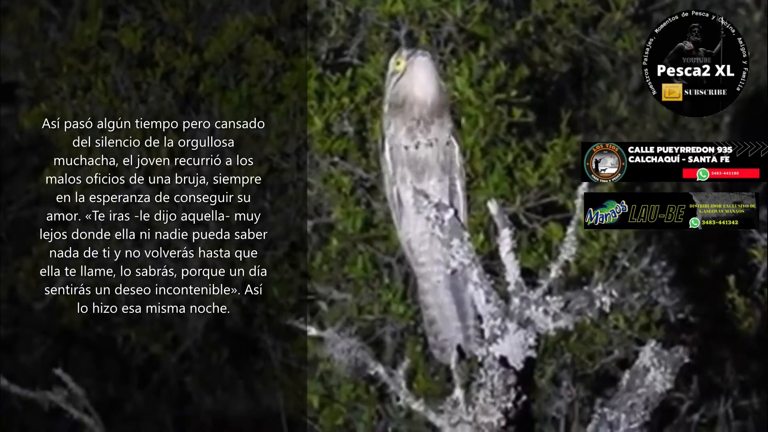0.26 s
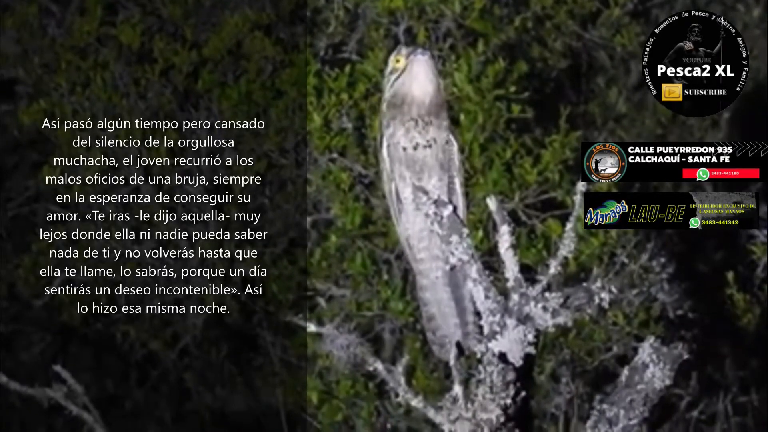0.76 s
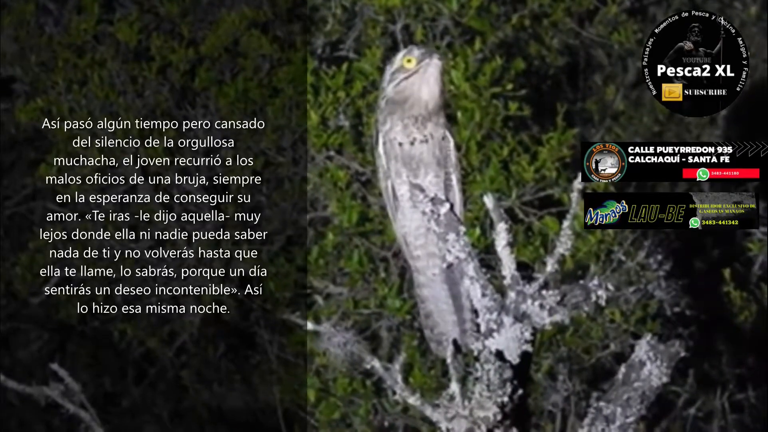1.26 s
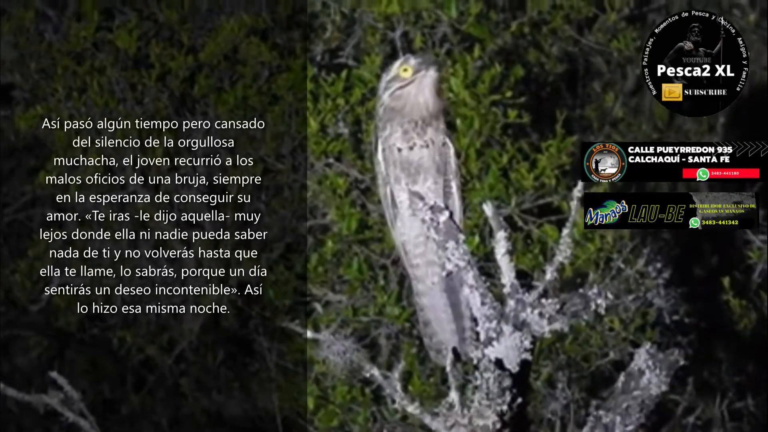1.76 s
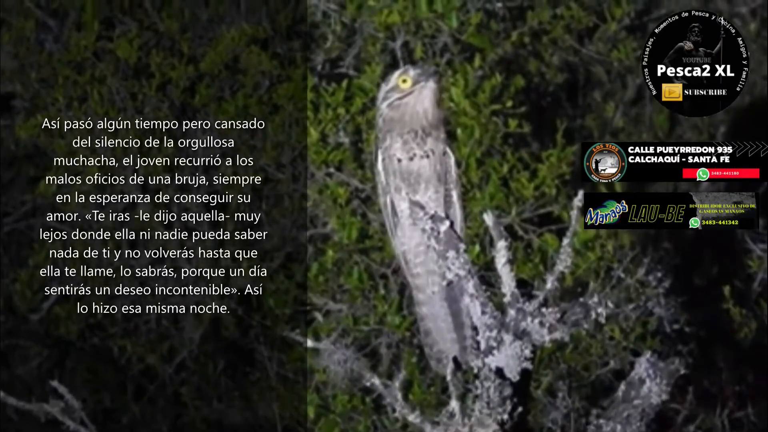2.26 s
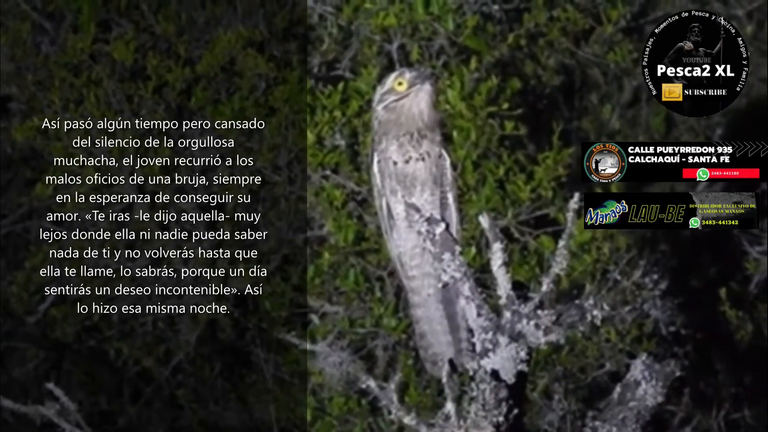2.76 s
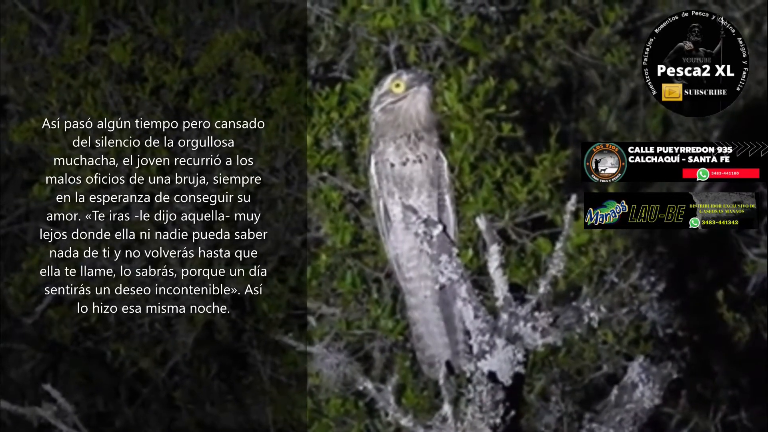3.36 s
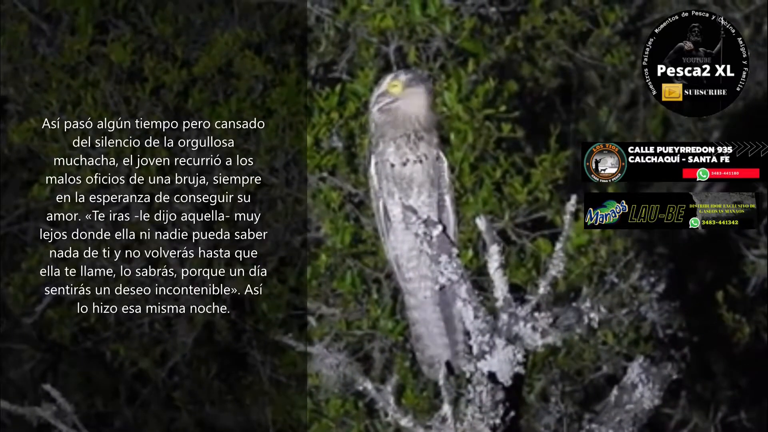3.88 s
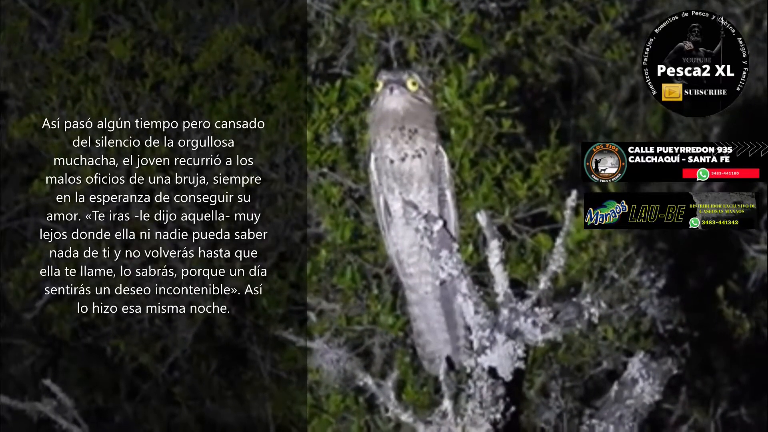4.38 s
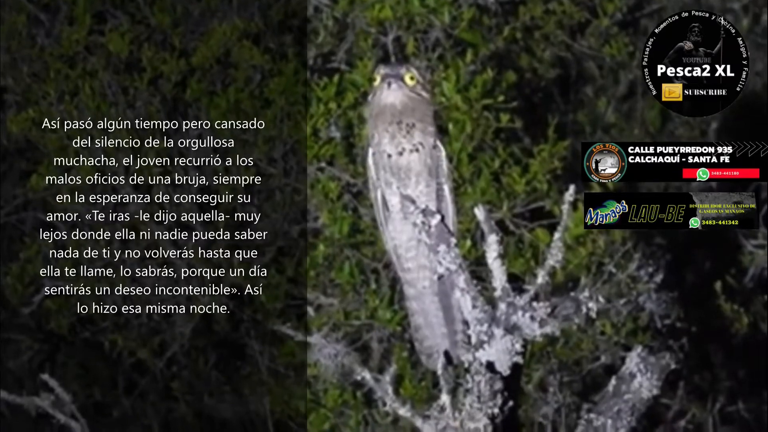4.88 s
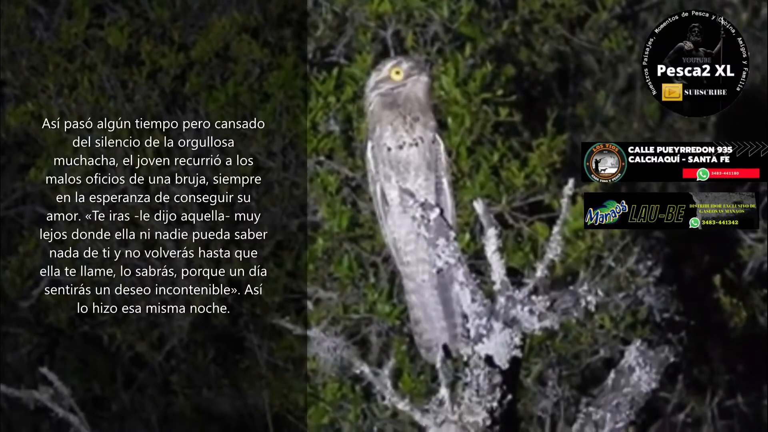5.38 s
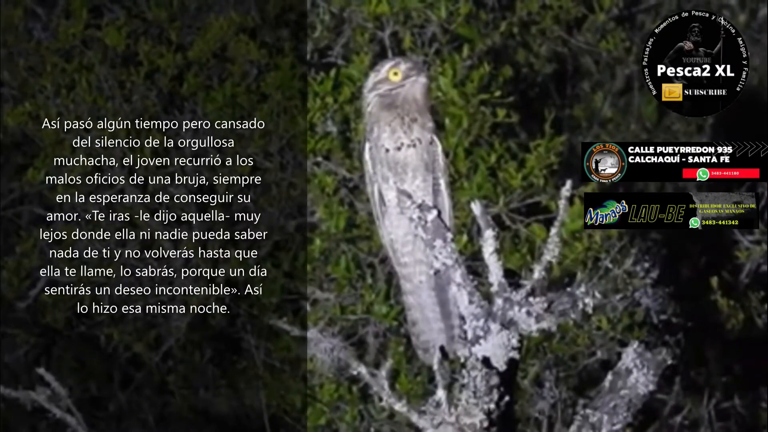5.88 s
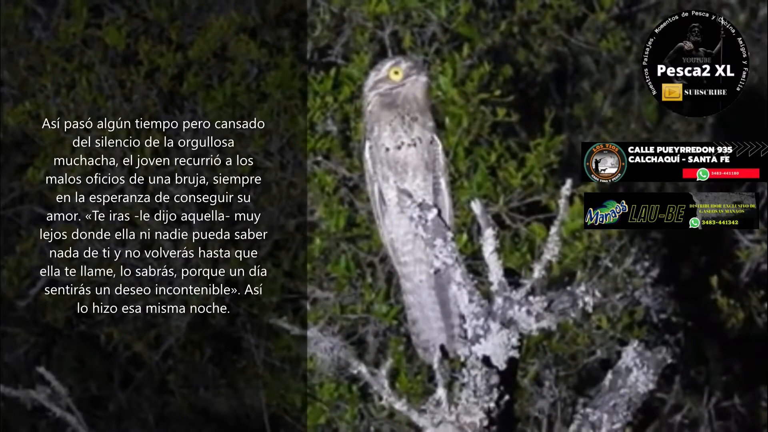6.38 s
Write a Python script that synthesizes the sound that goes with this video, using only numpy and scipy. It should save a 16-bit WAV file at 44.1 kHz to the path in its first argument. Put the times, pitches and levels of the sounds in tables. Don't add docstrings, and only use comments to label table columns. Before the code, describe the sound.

Outdoors at night, a bird on a branch gives a loud, pure whistle right at the start, then two much quieter, lower notes within the first second and a half. A nearby cricket chirps about six times a second throughout, over many far crickets and a bright insect hiss. Small twig ticks, one dull knock and very faint dove-like hoots follow. Stereo microphones, with light echo from trees.

```python
import sys
import numpy as np
from scipy import signal
from scipy.fft import rfft, irfft
from scipy.io import wavfile
from scipy.ndimage import uniform_filter1d

SR = 44100
rng = np.random.default_rng(int(sys.argv[2]) if len(sys.argv) > 2 else 0)


def store_pcm(level_fs):
    pcm = np.round(np.clip(level_fs, -1, 1) * 32767).astype(np.int16)
    wavfile.write(sys.argv[1], SR, np.atleast_2d(pcm).T)


def ratio(d):
    e = np.asarray(d, float) / 20
    return 10 ** e


N = 292383

# t/s, f/Hz, level/dB
WHISTLED_NOTES = [
    [(0, 884, -18.5), (.03, 883, -17.8), (.08, 902, -19.5), (.15, 915, -21), (.218, 919, -20)],
    [(.39, 736, -51), (.41, 746, -35.5), (.465, 746, -31), (.575, 764, -29), (.66, 756, -31.5),
     (.77, 732, -32), (.82, 764, -30.5)],
    [(1.036, 612, -49.5), (1.066, 629, -33.5), (1.14, 649, -32.5), (1.22, 645.4, -33), (1.39, 623, -37.5),
     (1.507, 596, -40.5)],
]
# t/s from its start, climb from the gulp/0-1, level/dB
SCOOP_UP = [(-.095, -.1, -78), (-.079, 0, -46), (-.06, .3, -67), (-.035, .72, -52.5), (-.015, .9, -58)]
# t/s from its end, share of its pitch/0-1, level/dB re its end
HOOK_DOWN = [(.006, .985, -3.5), (.013, .9, -16), (0.025, .76, -39)]
# f/Hz, level/dB per Hz
HISS_SPECTRUM = [(30, -44), (80, -42.5), (190, -27.5), (500, -34), (1050, -32.5), (1300, -34),
                 (1720, -30.5), (2640, -36.5), (4060, -32), (4800, -30), (5600, -16.5), (6850, -6),
                 (7700, -23.5), (8600, -40.5), (15500, -55.5)]
# f/Hz, width/Hz, level/dB over the hiss, throbs/per s
SINGERS_IN_HISS = [
    (4035, 330, 4, 3.5),
    (7485, 81, 7.5, 4.7),
    (670, 96, 4, 0.68),
    (1055, 58, 5.5, .9),
]
# t/s, length/s, level/dB added to the rumble
WIND_GUSTS = [
    (.7, 0.97, 11.5),
    (5.497, .6, -4),
    (6.2, 0.28, 2),
]
# t/s, length/s, f/Hz, width/Hz, level/dB over the hiss
UNDERGROWTH = [
    (3.53, 0.2, 720, 440, 4.5),
    (6.4, .05, 180, 55, 7),
    (4.85, 0.38, 600, 270, 3),
    (3.9, .03, 400, 60, 6),
]
# f/Hz, likeness/0-1
HISS_LIKENESS = [(60, 0.25), (180, 0.11), (500, .5), (1000, 0.72), (2500, 0.3), (5000, 0.59), (7000, 0.97),
                 (9500, 0.71), (14000, 0.54)]
# f/Hz, lead/rad
HISS_LEAD = [(0, 0), (1720, -0.11), (3790, -0.17), (4220, 1.46), (5250, 0.93), (6030, 2.5), (6370, 2),
             (6980, -0.23), (8440, 0.46)]
# chirps/per s, level/dB, pitch factor, lead at the left/samples
FAR_CRICKETS = [
    (5.5, -32, 1.01, 2.5),
    (5.9, -33, .98, 0.5),
    (6.2, -37, 1.03, 13.5),
    (5.2, -41.5, .95, 0),
    (5.7, -38, .9, 4),
    (6, -54, 1.0, -3),
]
# share of the stroke/0-1, f/Hz
STROKE_PITCH = [(0, 7027), (.35, 7010), (.62, 6774), (.85, 6265), (1, 5400)]
# t/s of first stroke, s from first to last stroke
NEAR_CHIRPS = [(0.0571, 0.0725), (0.2166, 0.0725), (0.3771, 0.0704), (0.5421, 0.073), (0.7181, 0.0725),
               (0.8866, 0.0714), (1.0536, 0.0719), (1.2282, 0.0584),
               (1.4796, 0.0709), (1.6686, 0.0576), (1.8504, 0.0593), (2.0402, 0.0584), (2.2016, 0.073),
             (2.3771, 0.073), (2.5516, 0.073), (2.7197, 0.0882), (2.8956, 0.0719), (3.0786, 0.0719),
             (3.2616, 0.0719), (3.4376, 0.0714), (3.6111, 0.073), (3.7944, 0.0567), (3.9481, 0.0704),
             (4.113, 0.0741), (4.2885, 0.087), (4.471, 0.087), (4.6541, 0.0709), (4.8141, 0.0709),
             (4.9721, 0.073), (5.1478, 0.0851), (5.3216, 0.0714), (5.4801, 0.073), (5.6561, 0.0863),
             (5.853, 0.0571), (6.0049, 0.0876), (6.1881, 0.0863), (6.3691, 0.0725), (6.5435, 0.0735)]
# t/s, level/dB at the peak
TWIG_TICKS = [
    (0.257, -32),
    (0.961, -49),
    (1.1045, -39.5),
    (2.738, -44.5),
    (4.015, -40),
    (5.549, -42),
    (5.7, -55),
    (5.9077, -40.5),
    (6.0912, -56.5),
]
# t/s, level/dB at the peak, f/Hz
DULL_KNOCK = (4.5875, -32.5, 690)
# t/s, held/s, f/Hz, level/dB, roughness/0-1
FAR_HOOTS = [
    (1.5, 0.057, 346.6, -57.5, 1.06),
    (1.795, 0.072, 342, -53, 0.03),
    (3.39, 0.226, 360.6, -63, 0.6),
    (3.83, 0.063, 341.6, -50, 0.02),
    (5.62, .16, 359.7, -60.5, 0.45),
    (5.976, .08, 343, -53, 0.03),
]


def evened(x):
    return x / np.sqrt(np.mean(x ** 2) + 1e-20)


def read(points, hz):
    f, value = np.transpose(points)
    return np.interp(np.log(hz + 1), np.log(f + 1), value)


def add(mix, s, sound):
    part = mix[max(round(s * SR), 0):][:len(sound)]
    part += sound[:len(part)]


def drift(length, size):
    smooth = uniform_filter1d(rng.standard_normal(length), size)
    return evened(uniform_filter1d(smooth, size))


def paired(x, lead):
    shift = np.exp(1j * np.pi * lead * np.fft.rfftfreq(N))
    return irfft(rfft(x) * np.array([shift, 1 / shift]), N)


def trees(x, t60, gap_s):
    t = np.arange(SR // 2) / SR
    hits = rng.standard_normal((2, len(t))) * (rng.random((2, len(t))) < .05)
    tail = hits * ratio(-60 * t / t60) * (t > gap_s)
    return signal.fftconvolve(x[None], tail / np.linalg.norm(tail[0]), axes=1)[:, :N]


def whistle(rows):
    s, hz, db, *given_rough = np.transpose(rows)
    t = np.arange(s[0], s[-1], 1 / SR)
    level_db = np.interp(t, s, db)
    if given_rough:
        rough = np.interp(t, s, given_rough[0])
    else:
        rough = 0.0001 + np.minimum(ratio(-56 - level_db) ** 4, .4)
    rough = np.clip(rough, 0, 1)
    pitch = uniform_filter1d(np.interp(t, s, hz), size=300) * (1 + 0.0005 * drift(len(t), size=500))
    turn = 2 * np.pi * np.cumsum(pitch) / SR
    flutter = drift(len(t), size=250) * np.sin(turn) + drift(len(t), size=250) * np.cos(turn)
    throat_hz, overtone_db = 1420, -30
    overtone = ratio(overtone_db + 1.3 * (level_db - max(db))) / (1 + ((2 * pitch - throat_hz) / 200) ** 4)
    tone = np.sqrt(1 - rough) * np.sin(turn) + np.sqrt(rough / 2) * flutter
    tone = tone + overtone * np.sin(2 * turn)
    return s[0], np.sqrt(2) * ratio(uniform_filter1d(level_db, size=150)) * tone


def note(held):
    (s, hz, _), (end, end_hz, end_db) = held[0], held[-1]
    gulp_hz = 316.4
    slower = 670 / hz
    scoop = []
    if s > 0:
        scoop = [(s + d * slower, gulp_hz + k * (hz - gulp_hz), db) for d, k, db in SCOOP_UP]
    hook = [(end + d, k * end_hz, end_db + db) for d, k, db in HOOK_DOWN]
    return scoop + held + hook


def loudness_db(sound, size, frame_at):
    power = abs(uniform_filter1d(sound ** 2, size=size))
    return 10 * np.log10(np.interp(frame_at, np.arange(N), power) + 1e-9)


def night(bird, near):
    frames, hz = N // 256 + 5, np.fft.rfftfreq(1024, 1 / SR)
    a, b, c, d, patches = rng.standard_normal((frames, 513, 5)).T
    patches = evened(uniform_filter1d(uniform_filter1d(patches, 10, 0), 20, 1))
    same = np.clip(read(HISS_LIKENESS, hz), -1, 1)[:, None]
    left = a + 1j * b
    right = same * left * np.exp(-1j * read(HISS_LEAD, hz))[:, None] + np.sqrt(1 - same ** 2) * (c + 1j * d)
    t = np.arange(frames) * 256 / SR
    f_axis = hz[:, None]
    field_db = read(HISS_SPECTRUM, hz)[:, None] + 1.3 * patches
    for f, width, db, throb in SINGERS_IN_HISS:
        pulse = 1 + 0.38 * np.sin(2 * np.pi * throb * t + 1.32 * drift(frames, size=100))
        field_db = field_db + db * np.exp(-((f_axis - f) / width) ** 2) * pulse
    for s, length, db in WIND_GUSTS:
        field_db = field_db + db * np.exp(-((t - s) / length) ** 2) / (1 + (f_axis / 120) ** 4)
    for s, length, f, width, db in UNDERGROWTH:
        field_db = field_db + db * np.exp(-((f_axis - f) / width) ** 2 - ((t - s) / length) ** 2)
    note_dip = 0.21 * np.maximum(loudness_db(bird, 1500, t * SR) + 48.5, 0)
    lower_band = 1 / (1 + (f_axis / 3800) ** 6) / (1 + (200 / (f_axis + 1)) ** 4)
    field_db = field_db - note_dip * lower_band
    chirp_dip = .4 * np.maximum(loudness_db(near, 2500, t * SR) + 43, 0)
    field_db = field_db + (1.5 - chirp_dip) * np.exp(-((f_axis - 9400) / 1500) ** 4)
    z = np.array([left, right]) * ratio(field_db)
    hiss = signal.istft(z, nperseg=1024, noverlap=768)[1][:, :N]
    return ratio(-34.5) * evened(hiss)


def stroke(db, factor, chance):
    share = np.linspace(0, 1, round(0.01138 * SR))
    pitch = factor * (1 + 0.0081 * chance[0]) * np.interp(share, *np.transpose(STROKE_PITCH))
    flutter = 1 + 0.21 * np.sin(2 * np.pi * (2.3 * share + chance[2]))
    shape = np.sin(np.pi * share ** 1.03) ** 1.62 * flutter
    ring = np.sin(2 * np.pi * (np.cumsum(pitch) / SR + chance[2]))
    return ratio(db + 2.5 + 0.5 * chance[1]) * shape * ring


def cricket(chirps, factor):
    out = np.zeros(N)
    for s, strokes, rate, db, first_db in chirps:
        chance = rng.standard_normal((9, 4))
        for k in range(round(strokes)):
            at = s - .0052 + k / rate + .0004 * chance[k, 3]
            stroke_db = db + 0.13 * (k - 3) if k else first_db - 2.0
            add(out, at, stroke(stroke_db, factor * (1 if k else .975), chance[k]))
    return out


def chorus():
    out = np.zeros((2, N))
    for pace, db, factor, lead in FAR_CRICKETS:
        starts = np.cumsum(1 + .06 * rng.standard_normal(50)) / pace - rng.random() / pace - .08
        levels_db = db + 2.2 * rng.standard_normal(50)
        chirps = [(s, 6, 69, l, l - 5) for s, l in zip(starts, levels_db) if 0 < s < N / SR]
        one = cricket(chirps, factor)
        out += paired(one, lead) + ratio(-2.5) * trees(one, 0.18, 0.0033)
    return out


def chirp(s, length):
    gaps = round(length * 69.4)
    chirp_db = -23.5
    first_db = chirp_db - 6.5 - 4.5 * (gaps - 5)
    return s, gaps + 1, gaps / length, chirp_db, first_db


def twigs():
    out, t = np.zeros(N), np.arange(200) / SR
    for s, db in TWIG_TICKS:
        ring = np.cos(2 * np.pi * (10500 * (t - .0004) + rng.random()))
        snap = np.exp(-((t - .0004) / .00007) ** 2) * ring
        add(out, s, ratio(db + 6) * snap / abs(snap).max())
    s, db, hz = DULL_KNOCK
    thump = np.exp(-((t - .0022) / 0.00075) ** 2) * np.cos(2 * np.pi * hz * (t - .002))
    add(out, s - .002, ratio(db) * thump)
    return out


def hoot(s, held, hz, db, rough):
    rise_s, fall_s, tail_s, tail_db = 0.036, .03, 0.06, -13.5
    end, edge_hz = s + rise_s + held, hz * 1.04
    return [(s, edge_hz, db - 19, rough + .3),
            (end - held, hz, db, rough),
            (end, hz, db - 0.5, rough),
            (end + fall_s, edge_hz, db + tail_db, rough + 0.23),
            (end + fall_s + tail_s, edge_hz, db + tail_db, rough + .5),
            (end + 2 * fall_s + tail_s, edge_hz, db - 21, rough + .6)]


def scene():
    bird, hoots, slap = np.zeros(N), np.zeros(N), np.zeros(N)
    for rows in WHISTLED_NOTES:
        add(bird, *whistle(note(rows)))
    for row in FAR_HOOTS:
        add(hoots, *whistle(hoot(*row)))
    add(slap, .078, ratio(-28.5) * bird)
    add(slap, .1, ratio(-14) * hoots)
    near = cricket([chirp(*row) for row in NEAR_CHIRPS], 1)
    birds = paired(bird + slap + hoots + twigs(), 0.57)
    birds = birds + ratio(-30.5) * trees(bird, 0.69, 0.034) + ratio(-18) * trees(hoots, 0.27, 0.015)
    insects = paired(near, .1) * ratio([[.3], [-.3]])
    insects = insects + ratio(-12.5) * trees(near, 0.18, .002) + chorus()
    return birds + insects + night(bird, near)


def band_limit(x):
    return signal.sosfilt(signal.butter(12, 15780, fs=SR, output="sos"), x)


def record(dry):
    return band_limit(dry)


dry = scene()
out = record(dry)
store_pcm(out)
```